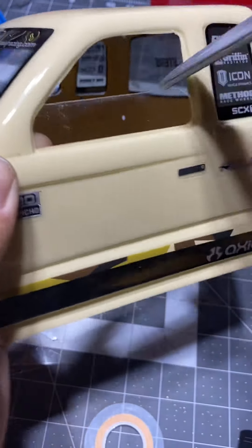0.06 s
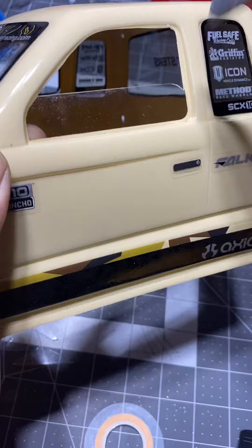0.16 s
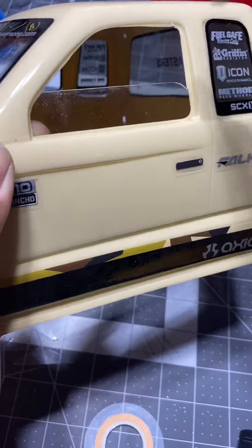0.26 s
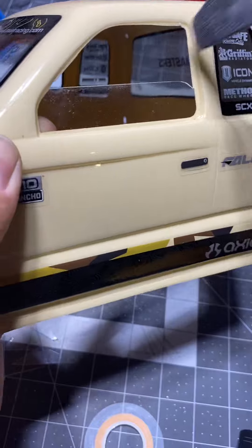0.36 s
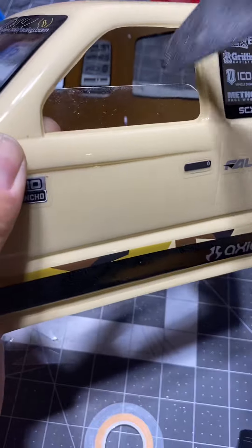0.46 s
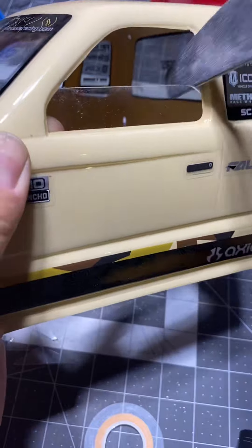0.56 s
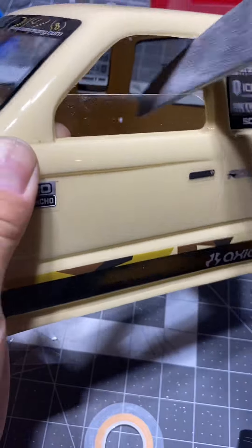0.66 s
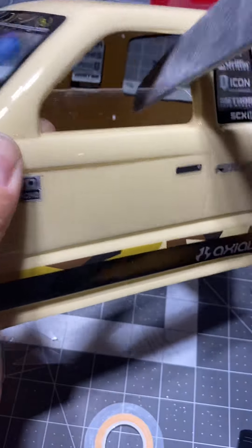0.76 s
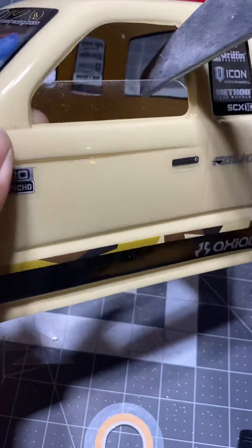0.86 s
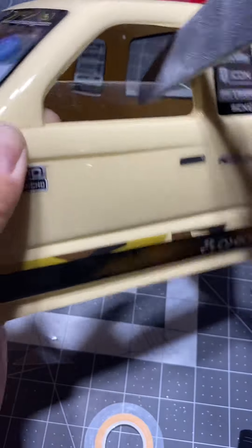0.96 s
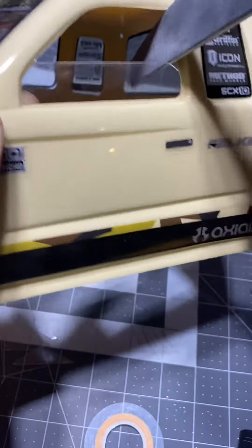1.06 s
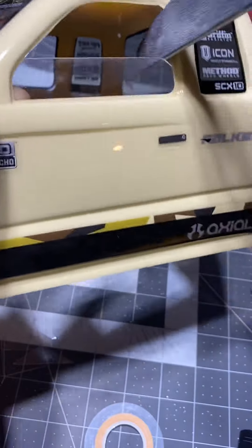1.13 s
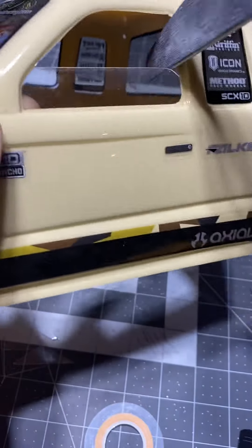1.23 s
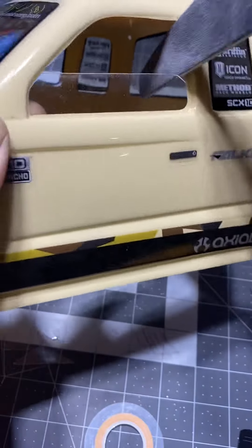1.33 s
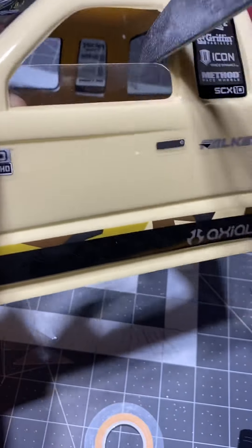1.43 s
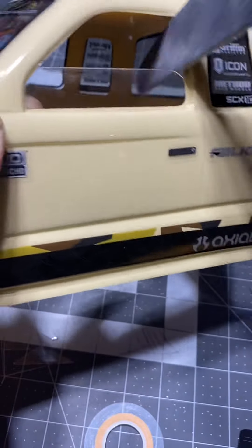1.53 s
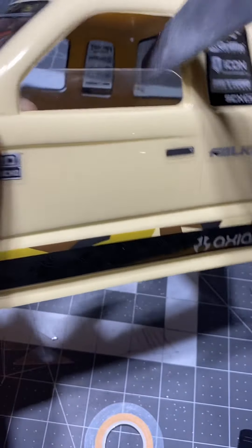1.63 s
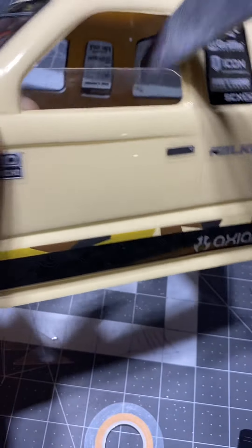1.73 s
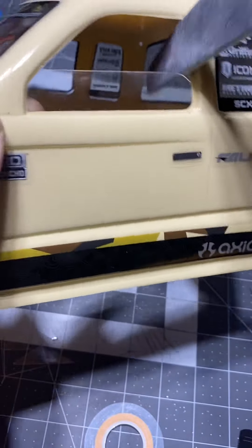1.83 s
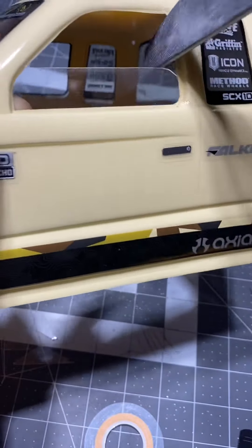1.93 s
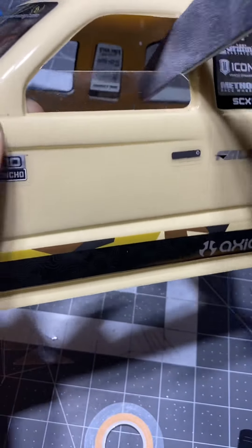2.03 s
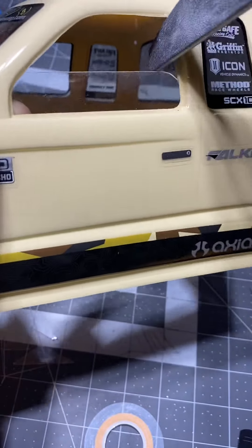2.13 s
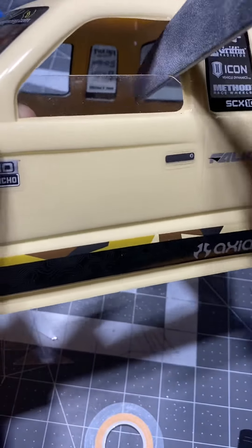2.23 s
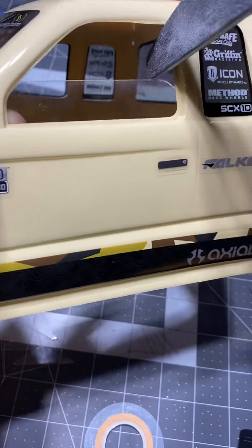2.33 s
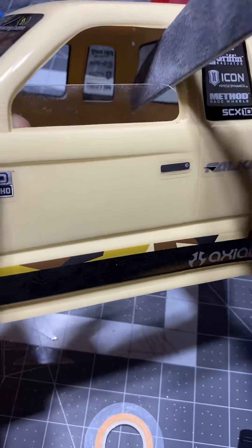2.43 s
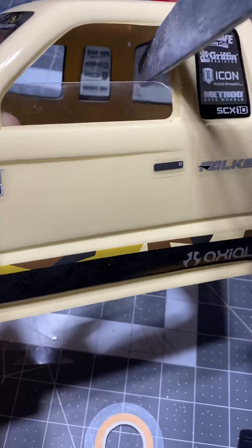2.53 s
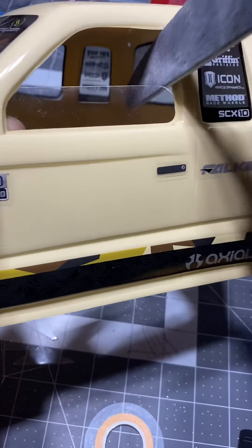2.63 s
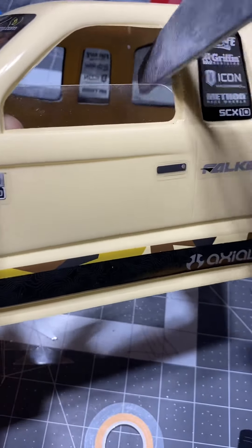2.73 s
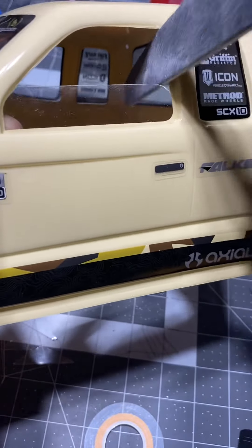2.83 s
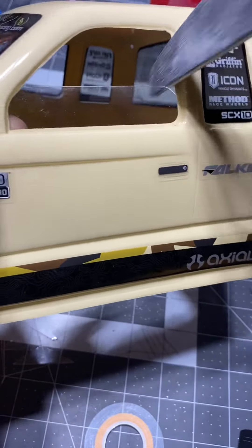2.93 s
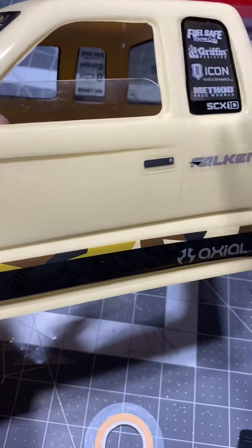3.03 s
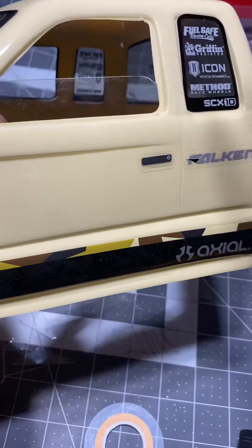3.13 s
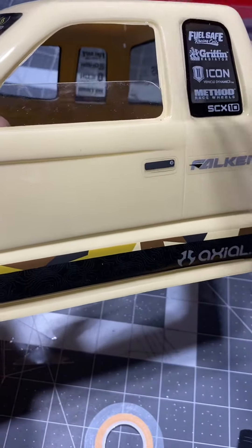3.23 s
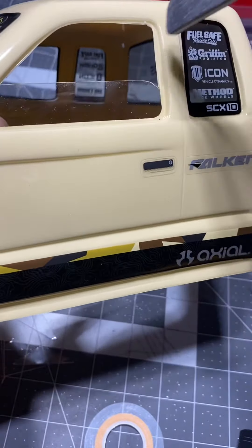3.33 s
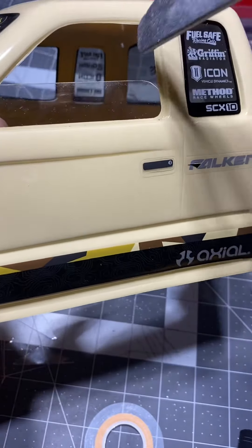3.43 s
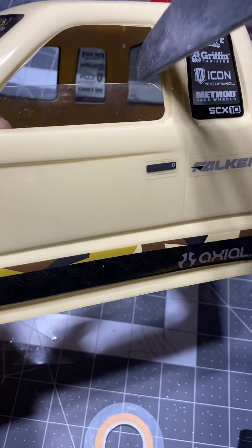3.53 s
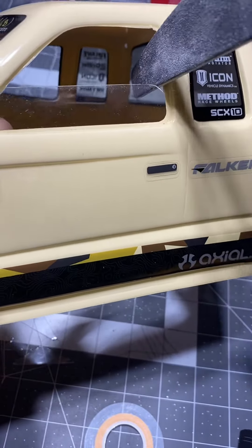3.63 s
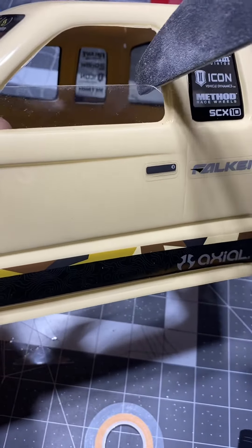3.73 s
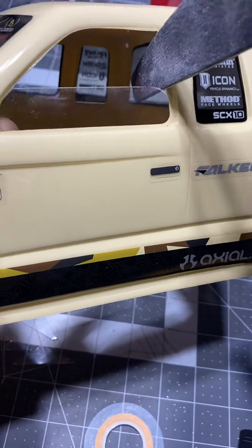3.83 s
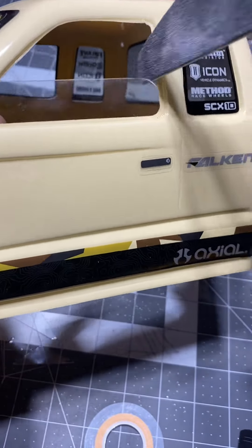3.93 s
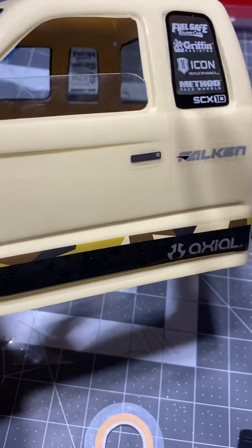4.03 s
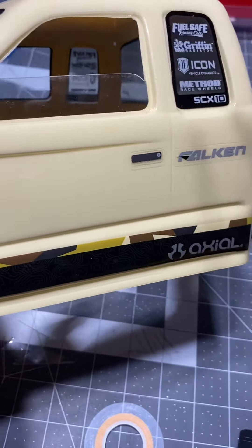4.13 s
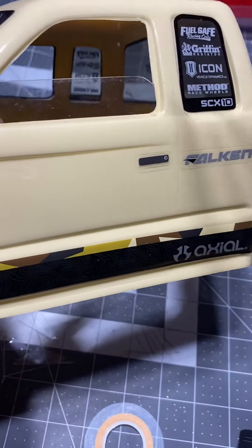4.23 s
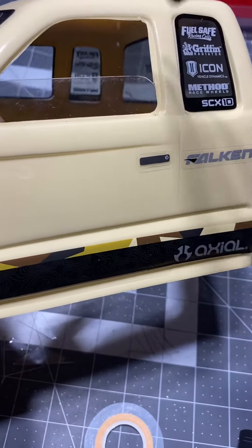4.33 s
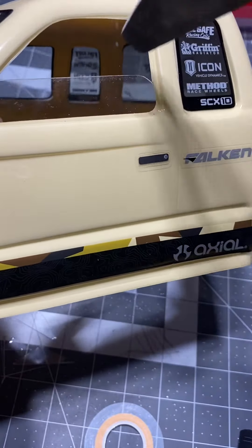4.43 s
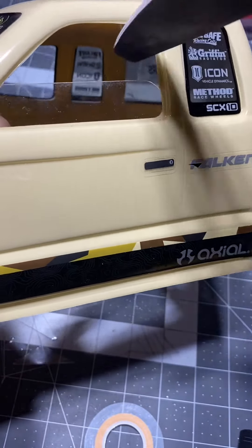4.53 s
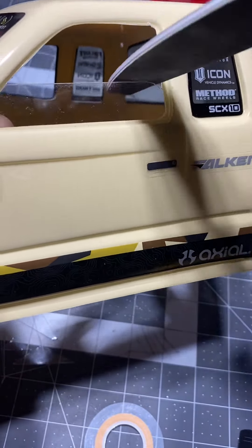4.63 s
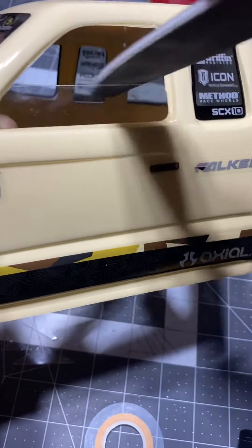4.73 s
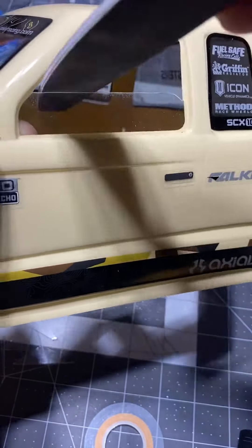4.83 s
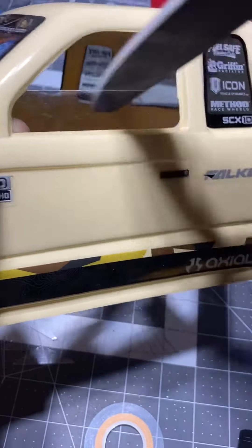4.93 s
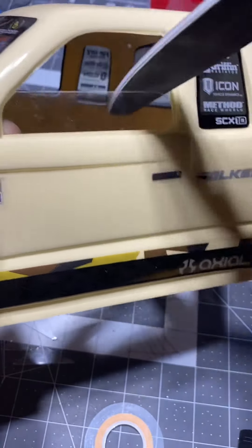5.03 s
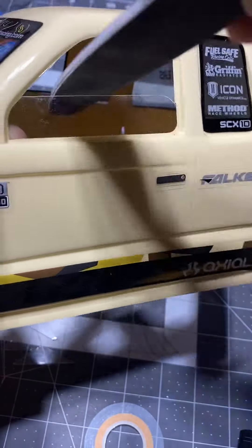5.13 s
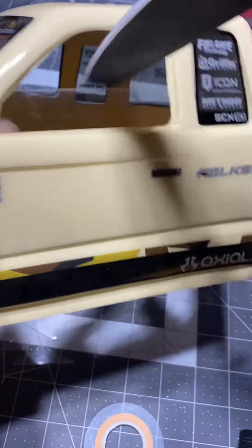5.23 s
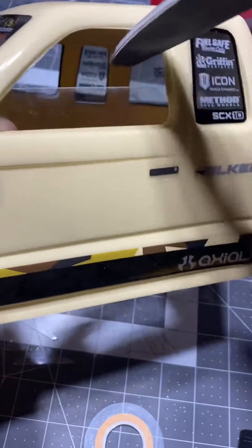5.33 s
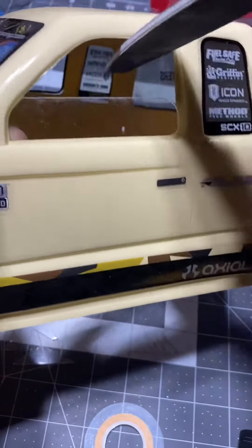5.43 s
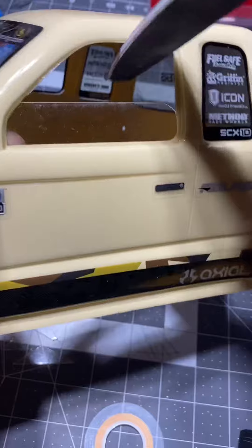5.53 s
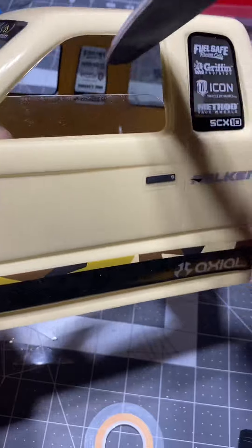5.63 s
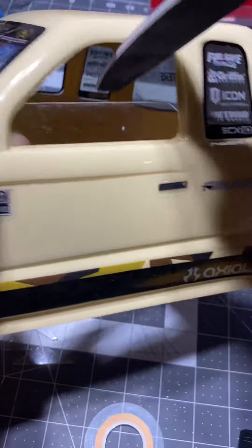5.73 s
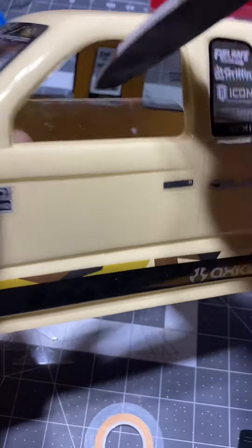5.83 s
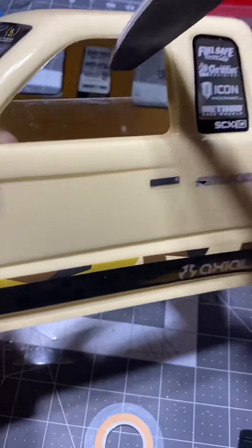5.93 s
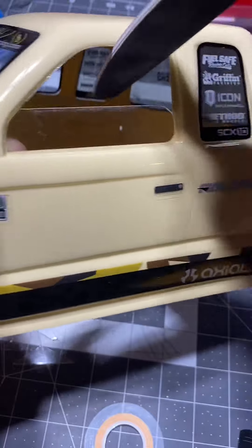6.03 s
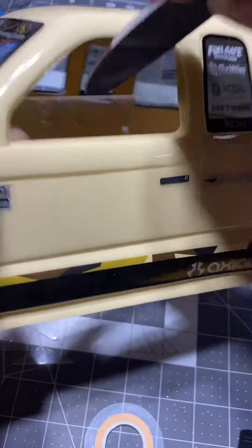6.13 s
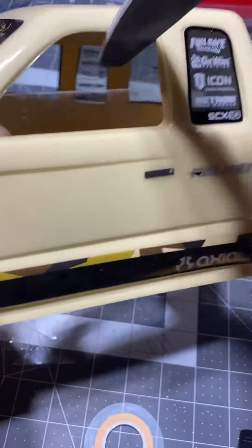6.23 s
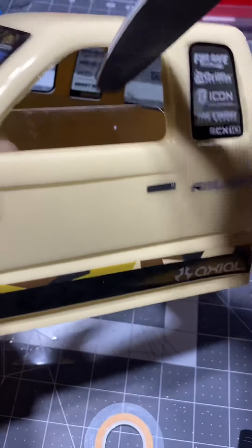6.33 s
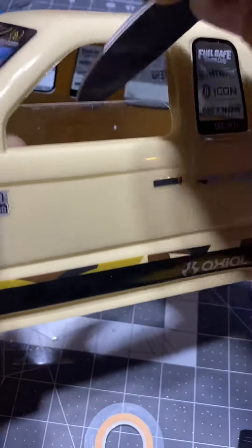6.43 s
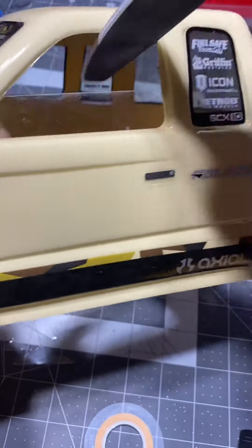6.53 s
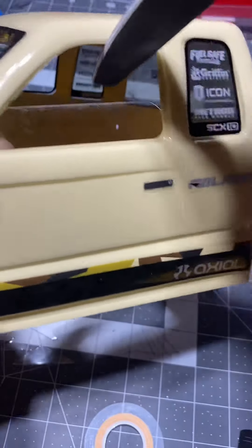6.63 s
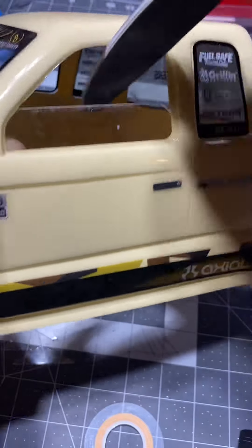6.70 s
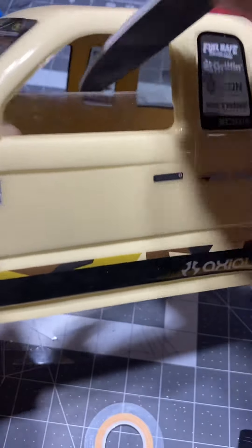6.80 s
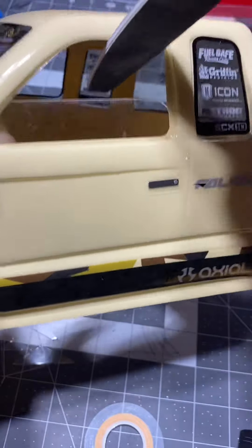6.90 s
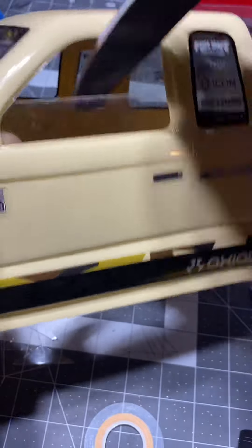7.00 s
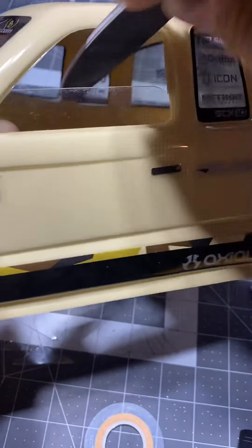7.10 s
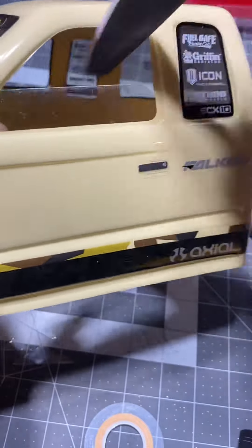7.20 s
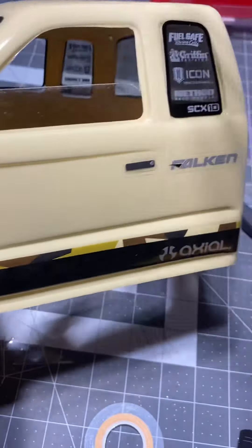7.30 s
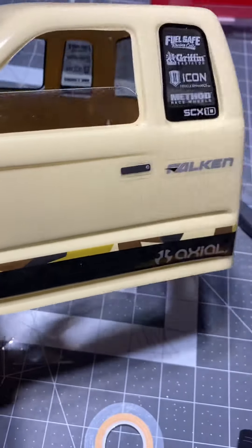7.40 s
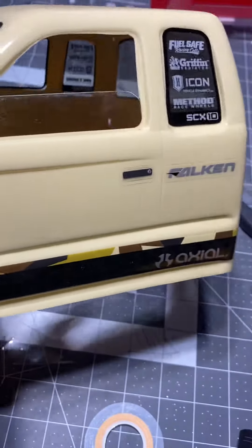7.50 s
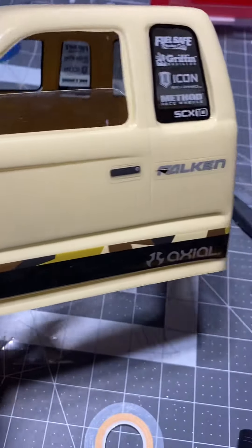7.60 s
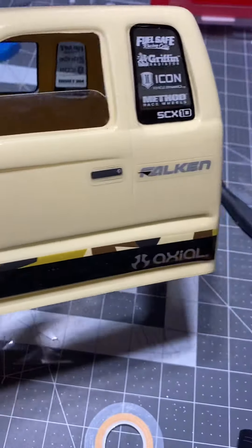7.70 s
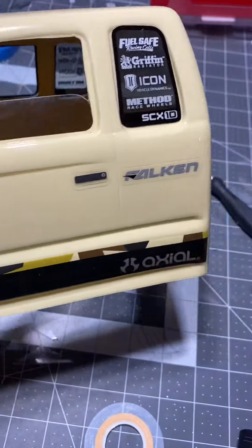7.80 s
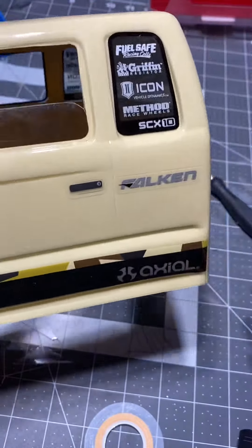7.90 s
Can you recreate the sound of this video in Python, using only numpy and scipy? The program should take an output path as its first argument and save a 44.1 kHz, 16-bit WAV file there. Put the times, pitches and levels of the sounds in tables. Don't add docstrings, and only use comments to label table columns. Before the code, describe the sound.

Rough abrasive strokes on a hollow lightweight plastic shell, recorded close by phone indoors over a faint low room hush. Scrapes are grainy and boxy, with a nasal ring. They alternate quickly in the middle, pause, return hard, drop to light touches with one strong knock, then become longer back-and-forth rasps. A last squeal, then quiet handling and a small thud.

```python
import sys
import numpy as np
from scipy import signal
from scipy.fft import rfft, irfft, next_fast_len
from scipy.io import wavfile
from scipy.ndimage import uniform_filter1d, map_coordinates

SR = 44100
rng = np.random.default_rng(int(sys.argv[2]) if len(sys.argv) > 2 else 0)


def unload_audio(sound):
    columns = np.transpose(np.atleast_2d(sound))
    steps = np.round(np.clip(columns, -1, 1) * 32767)
    wavfile.write(sys.argv[1], SR, steps.astype(np.int16))


def gain_from_db(level_db):
    decades = np.asarray(level_db, float) / 20
    return 10 ** decades


N = 351035


def unit(x):
    return x / np.sqrt(np.mean(x ** 2) + 1e-20)


def along(points, hz):
    f, v = np.transpose(points)
    return np.interp(np.log(hz + 1), np.log(f + 1), v)


def filtered(x, response):
    m = next_fast_len(x.shape[-1] + 8192)
    spectrum = rfft(x, m) * response(np.fft.rfftfreq(m, 1 / SR))
    return irfft(spectrum, m)[..., :x.shape[-1]]


def hum():
    # (frequency [Hz], density [dB per Hz])
    hush = [(15, -58.5), (25, -31), (60, -4.5), (109, -12), (161, -4.5), (183, -18), (358, -42), (541, -26),
            (839, -53), (12000, -60), (15600, -88), (22000, -120)]
    # (frequency [Hz], correlation [1])
    likeness = [(130, 1), (290, 0.72), (640, 0.64)]

    def spread(hz):
        turn = np.arccos(np.clip(along(likeness, hz), -1, 1)) / 2
        return gain_from_db(along(hush, hz)) * [np.cos(turn), np.sin(turn)]

    mid, side = filtered(rng.standard_normal((2, N)), spread)
    return gain_from_db(-63.5) * unit(np.array([mid + side, mid - side]))


def room(x):
    # (frequency [Hz], t60 [s])
    decay = [(150, 0.62), (400, 0.35), (1500, 0.27), (5000, 0.3), (12000, 0.017)]
    hz, t, noise = signal.stft(rng.standard_normal((2, SR)), SR, nperseg=256)
    dying = noise * gain_from_db(-60 * t / along(decay, hz)[:, None])
    tail = signal.istft(dying, SR, nperseg=256)[1]
    late = np.pad(x, (300, 0))[None]
    return signal.fftconvolve(late, tail / np.linalg.norm(tail[0]), axes=1)[:, :N]


def grains(size, per_s, spread_db, clump_db):
    hit = rng.random(size) < per_s / SR
    force = rng.standard_normal(size) * gain_from_db(spread_db * np.minimum(rng.exponential(size=size), 4))
    clumps = map_coordinates(rng.standard_normal(size // 200 + 4), [np.arange(size) / 200])
    rough = hit * force * gain_from_db(clump_db * clumps)
    return rough / np.sqrt(np.abs(uniform_filter1d(rough ** 2, size=1300)) + 1e-9)


def brush():
    # (time [s], length [s], rms level [dB])
    touches = [
        (.1, 0.13, -66),
        (4.277, 0.072, -67.5),
        (4.359, .03, -76),
        (7.501, .05, -67),
        (7.598, 0.087, -66.5),
        (7.791, 0.13, -63),
    ]
    t = np.arange(N) / SR
    shape = sum(gain_from_db(db) * np.sin(np.pi * np.clip((t - s) / length, 0, 1)) for s, length, db in touches)
    cloth = grains(N, per_s=5100, spread_db=2, clump_db=2.5)
    colour = [(900, -25), (2500, -0.5), (4000, -0.5), (8000, -1), (15000, -1.0)]  # (frequency [Hz], level [dB])
    return shape * unit(filtered(cloth, lambda hz: gain_from_db(along(colour, hz))))


def grip():
    # (time [s], length [s], rms level [dB])
    shifts = [
        (7.781, 0.19, -40.5),
    ]
    t = np.arange(N) / SR
    shape = sum(gain_from_db(db) * np.sin(np.pi * np.clip((t - s) / length, 0, 1) ** 0.42) for s, length, db in shifts)
    colour = [(30, -22.5), (90, -10), (250, -5.5), (600, -33), (2000, -70.5)]  # (frequency [Hz], level [dB])
    return shape * unit(filtered(rng.standard_normal(N), lambda hz: gain_from_db(along(colour, hz))))


def rings():
    # (time [s], peak [dB], frequency [Hz], t60 [s])
    tones = [
        (2.95, -43.5, 300, 0.29),
        (3.956, -20.5, 255, 0.15),
        (7.251, -34, 290.3, 0.43),
        (7.832, -15.5, 312, 0.034),
        (1.03, -33, 55, 0.23),
        (2.25, -36.5, 60, 0.17),
        (2.46, -34.5, 60, 0.16),
        (6.17, -34, 75, 0.16),
        (7.1, -40, 46.2, 0.34),
    ]
    t, out = np.arange(N) / SR, np.zeros(N)
    for s, db, hz, t60 in tones:
        age = np.clip(t - s, 0, None)
        out += gain_from_db(db - 60 * age / t60) * (1 - np.exp(-age / .004)) * np.sin(2 * np.pi * hz * age)
    return out


def knocks():
    # (time [s], peak [dB])
    blows = [
        (4.596, -13.5),
        (4.951, -1.5),
        (5.134, -14),
        (6.277, -12.5),
        (7.832, -34.5),
    ]
    # (frequency [Hz], level [dB], t60 [s])
    knock_modes = [(516, -3.5, 0.053), (680, -18.5, 0.13), (1363, -16.5, 0.018), (2030, -40, 0.068),
                   (2310, -26.5, 0.037)]
    out, t = np.zeros(N + SR), np.arange(SR // 4) / SR
    ring = sum(gain_from_db(level - 60 * t / t60) * np.sin(2 * np.pi * hz * t) for hz, level, t60 in knock_modes)
    for s, db in blows:
        out[round(s * SR):][:len(t)] += gain_from_db(db) * ring * (1 - np.exp(-t / 0.00056))
    return out[:N]


def ticks():
    # (time [s], peak [dB], centre frequency [Hz], t60 [s])
    cracks = [(0.549, -9.5, 1996, 0.032), (0.946, -31.5, 5920, 0.016), (0.954, -14, 5310, .02),
              (1.12, -9, 8780, 0.022), (1.532, -20, 3897, 0.034), (4.221, -59, 3500, 0.025),
              (4.253, -67, 2510, 0.028), (4.617, -36, 2500, 0.036), (4.672, -18, 2525, 0.017),
              (4.735, -17, 2544, 0.02), (4.849, -37.5, 3040, 0.036), (5.121, -30, 2960, 0.019),
              (5.158, -8.5, 2860, 0.011), (5.303, -47, 3090, 0.046), (7.082, -21.5, 2930, 0.02),
              (7.422, -52.5, 1950, 0.038), (7.517, -60, 3520, 0.038), (7.624, -61, 2394, .05),
              (7.83, -39.5, 4500, 0.017), (4.521, -37.5, 2480, .02), (3.742, -22, 5980, .015)]
    out, t = np.zeros(N + SR), np.arange(SR // 4) / SR
    for s, db, hz, t60 in cracks:
        crack = unit(signal.lfilter(*signal.iirpeak(hz, 1.7, SR), rng.standard_normal(len(t))))
        out[round(s * SR):][:len(t)] += gain_from_db(db - 3 - 60 * t / t60) * np.clip(t / 0.00063, 0, 1) * crack
    return out[:N]


def chatter():
    # (time [s], peak [dB], frequency [Hz], length [s])
    locked = [(1.3227, -3.5, 1447, 0.0099), (1.5725, -4, 1394, 0.017), (1.7972, -5.5, 1426, 0.0094),
              (2.0203, -2.5, 1413, 0.025), (2.2526, -6.5, 1360, 0.015), (2.4565, -4.5, 1445, 0.021),
              (2.664, -9.5, 1280, 0.041), (2.8657, -15, 1433, 0.019), (2.8895, -7.5, 1362, 0.042),
              (1.362, -9.5, 1430, .012), (1.826, -8, 1343, .01), (1.85, -12, 1395, .008),
              (2.052, -11, 1423, 0.011)]
    # (time [s], peak [dB], frequency [Hz], length [s])
    squeals = [
        (1.06, -13.5, 1350, .03),
        (5.82, -17, 1350, 0.02),
        (5.871, -24, 1376, 0.038),
        (7.165, -9, 2250, .05),
        (7.18, -12, 1176, 0.037),
    ]
    out, t = np.zeros(N + SR), np.arange(SR // 8) / SR
    for events, looseness in ((locked, .022), (squeals, .09)):
        for s, db, hz, length in events:
            waver = uniform_filter1d(rng.standard_normal((2, len(t))), size=150) * np.sqrt(150)
            ring_out_db = -60 * np.clip(t - length, 0, 1) / 0.053
            shape = np.clip(t / .004, 0, 1) * gain_from_db(ring_out_db + 2.7 * waver[0])
            cycle = 2 * np.pi * np.cumsum(hz * (1 + looseness * waver[1])) / SR
            tone = np.sin(cycle) + 0.11 * np.sin(2 * cycle)
            out[round(s * SR) - 80:][:len(t)] += gain_from_db(db - 6.0) * shape * tone
    return out[:N]


def strokes():
    # (time [s], length [s], level [dB], rise [dB])
    jabs = [(.848, 0.073, -25.5, 5), (1.319, .088, -17, -8), (1.565, 0.093, -20, -9.5),
            (1.788, 0.089, -18, -7.5), (2.016, .1, -24, -14.5), (2.242, 0.076, -19.5, -7),
            (2.457, 0.076, -22.5, -14.5), (2.664, .078, -21.5, -8.5), (2.868, 0.088, -17.5, -8),
            (3.617, .068, -19, 6), (4.616, .014, -33.5, -11.5), (4.671, .062, -36, -11),
            (4.732, .075, -35, -7.5), (5.022, .098, -38, -6), (5.131, .057, -27.5, -9.5),
            (7.83, 0.029, -52, -5.5)]
    # (time [s], length [s], level [dB], rise [dB])
    drags = [(0, 0.072, -30.5, -6.5), (1.433, .11, -24, 2), (1.675, .093, -28, 2), (1.894, 0.099, -27, 5.5),
             (2.767, .075, -27, 4), (3.722, 0.081, -17.5, 0), (3.835, 0.12, -17, -2.5),
             (4.518, .085, -38, 1), (5.335, .105, -41.5, -1), (5.792, .13, -18.5, 3.5),
             (6.446, .13, -20.5, 4.5), (6.757, 0.12, -25.5, 2)]
    # (time [s], length [s], level [dB], rise [dB])
    sweeps = [(.526, .072, -19, 6.5), (.597, 0.06, -19, 1.5), (.721, 0.096, -22.5, -1),
              (.943, .034, -30.5, -21.5), (1.042, 0.11, -18.5, -4.5), (1.208, 0.093, -22, -1),
              (2.138, 0.092, -27.5, -4), (2.337, 0.1, -25, 3.5), (2.548, 0.098, -29, 7),
              (3.505, .088, -33, -3.5), (4.882, .09, -28, -2), (5.49, 0.097, -23, 1),
              (5.622, .15, -22, 1.5), (5.945, .14, -17.5, 1), (6.119, .12, -14, 1.5),
              (6.269, .15, -18.5, 2), (6.597, .14, -21.5, -1), (6.902, 0.15, -22, -1.5),
              (7.081, .16, -17, 3.5)]
    # (time [s], length [s], level [dB], rise [dB])
    light = [
        (.498, 0.045, -42, 7.5),
        (1.012, 0.031, -37.5, 5),
        (5.303, 0.085, -56.5, 3),
        (7.773, .106, -72, 13.5),
        (4.8, 0.026, -45, 6),
    ]
    # (time [s], belly freedom [dB])
    looseness = [(0, 0), (.5, 4.5), (.9, 5.5), (1.21, 3.5), (1.31, -1), (2.9, -1.5), (3.85, 2), (4.52, 2),
                 (4.62, -1), (5.03, -2), (5.13, 6), (5.33, -2), (6.5, -1), (6.9, 3.5), (7.08, -2.5)]

    def shaped(table, arch_db, belly_db=0):
        s, length, db, rise_db = np.transpose(table)
        levels = [db - rise_db / 2 - arch_db, db, db + rise_db / 2 - arch_db]
        over_usual_db = np.max(levels, axis=0) + 25.5
        share_db = belly_db + np.interp(s, *np.transpose(looseness)) - 0.4 * over_usual_db
        return np.transpose([s, length, *levels, share_db]).tolist()

    filed = shaped(jabs, arch_db=-2) + shaped(drags, arch_db=1.14) + shaped(sweeps, arch_db=4)
    return sorted(filed) + shaped(light, arch_db=-5.5, belly_db=6.5)


def resonant(modes, corner, scatter_db):
    luck = rng.standard_normal((len(modes), 2))
    hz, width, db_mid, db_corner = np.transpose(modes)
    usual = gain_from_db(db_corner if corner else db_mid)
    gain = usual * gain_from_db(scatter_db * luck[:, 0]) * (-1) ** np.arange(len(hz))
    gain *= np.sqrt(np.sum(usual ** 2 * width) / np.sum(gain ** 2 * width))
    hz = hz * (1 + 0.025 * np.minimum(hz / 1400, 1) ** 2 * luck[:, 1])
    return lambda f: sum(g * 1j * f * w / (c * c - f * f + 1j * f * w) for c, w, g in zip(hz, width, gain))


def filing():
    # (frequency [Hz], width [Hz], filed mid-edge [dB], filed in the corner [dB])
    belly_modes = [(47.3, 26, -23.5, -25.5), (157, 140, -22.5, -18.5), (296.7, 49.4, -2, -3.5),
                   (432.2, 38, 1.5, -0.5), (540, 30, -4, 1), (683, 121, -12.5, -11)]
    panel_modes = [(847.3, 23.7, -4.5, -7.5), (1153.6, 23, -9, -11.5), (1308, 95, -1.5, -3.5),
                   (1363, 75, 2, 0.5), (1421.6, 75.6, -4.5, -2), (1662, 60, -10, -16.5),
                   (1792, 53, -6, -10), (2093, 190, -16, -15.5), (2250, 47, -16, -13), (2407, 81, -10, -14),
                   (2860, 40, -25.5, -21), (3170, 250, -16, -17), (3390, 250, -24, -28),
                   (3560, 50, -15, -34), (4900, 240, -34, -26), (5455, 130, -18.5, -20)]
    rocking_modes = [(536, 87, -16.5, -8.5), (835, 25, 8, 6), (1280, 450, -16, -24.5),
                     (2380, 150, -39, -45)]
    # (frequency [Hz], density [dB per Hz])
    grit_hiss = [(300, -44.5), (1500, -1), (3000, 2), (6000, -5), (7500, -3), (9500, -2.5), (12000, -9.5),
                 (15000, -14)]
    # (time [s], hiss [dB])
    coarseness = [(0, -3.5), (.5, -2), (1.2, 1.5), (1.5, 0), (2.9, 0), (3.6, 3.5), (4.6, 3.5), (5.3, 1.5),
                  (5.7, -0.5), (6.2, 3.5), (6.7, 0.5), (7.1, 4)]
    # (from [s], to [s])
    corner_time = (1.3, 4.0)
    span, lead = SR // 3, SR // 25
    shared, rocking = np.zeros(N + span), np.zeros(N + span)
    t = np.arange(span) / SR - lead / SR
    for s, length, early_db, mid_db, late_db, belly_db in strokes():
        swell = max(mid_db - early_db, 0)
        knots = [-.004 - 0.004 * swell, -.002 - 0.0031 * swell]
        knots += [length * u for u in (0, .15, .5, .85, 1)] + [length + 0.01]
        levels = [-90, early_db - 27, early_db - 0.5 - 1.3 * swell, early_db,
                  mid_db, late_db, late_db - 12.5, -90]
        push = gain_from_db(np.interp(t, knots, levels))
        pressure = np.sqrt(np.abs(uniform_filter1d(push ** 2, size=900, origin=300)))
        grit = grains(span, per_s=6000, spread_db=3.0, clump_db=0.94)
        scrape = push * grit
        corner = corner_time[0] < s < corner_time[1]
        belly = resonant(belly_modes, corner, scatter_db=2.5)
        rock = resonant(rocking_modes, corner, scatter_db=2.5)
        near, far = (resonant(panel_modes, corner, scatter_db=2.5) for _ in range(2))
        hiss_db = .5 * np.clip(belly_db, -12, 0) - 1.5 + np.interp(s, *np.transpose(coarseness))
        slide = np.pi / 2 * np.clip(t / length, 0, 1)
        panel = filtered(np.cos(slide) * scrape, near) + filtered(np.sin(slide) * scrape, far)
        at = slice(round(s * SR), round(s * SR) + span)
        shared[at] += gain_from_db(21) * panel
        shared[at] += filtered(scrape, lambda f: gain_from_db(hiss_db + along(grit_hiss, f)))
        shared[at] += filtered(pressure * grit, lambda f: gain_from_db(22 + belly_db) * belly(f))
        rocking[at] += filtered(scrape, lambda f: gain_from_db(10.5 + 0.31 * belly_db) * rock(f))
    return shared[lead:][:N], rocking[lead:][:N]


def scene():
    # (left delay [s], right delay [s], level [dB])
    echoes = [(.0007, 0.000635, -23.5), (.0019, 0.0019, -5), (.0031, .0036, -10.5)]
    port_lag = 5.2e-5
    shared, rocking = filing()
    shared = shared + knocks() + ticks() + chatter() + grip() + rings() + brush()

    def paths(hz):
        lag = np.exp(1j * np.pi * hz * port_lag * np.array([[1], [-1]]))
        table = sum(gain_from_db(db) * np.exp(-2j * np.pi * hz * np.array([[left], [right]]))
                    for left, right, db in echoes)
        bright = hz / (hz + 2500)
        return lag * (1 + bright * table)

    ports = filtered(shared, paths)
    near = ports * gain_from_db([[.4], [-.4]]) + np.array([[.95], [-1.05]]) * rocking
    return near + gain_from_db(-21.5) * room(shared) + hum()


def top_cut(x):
    return signal.sosfilt(signal.butter(12, 16810, fs=SR, output="sos"), x)


def record(dry):
    held = dry / (1 + np.abs(dry / .95) ** 6) ** (1 / 6)
    finished = filtered(held, lambda hz: hz < 15800)
    return top_cut(finished)


dry = scene()
out = record(dry)
unload_audio(out)
```